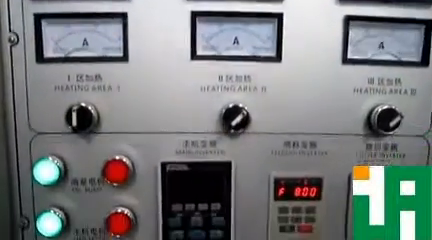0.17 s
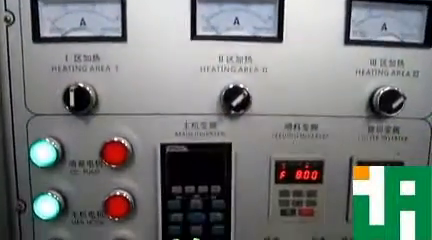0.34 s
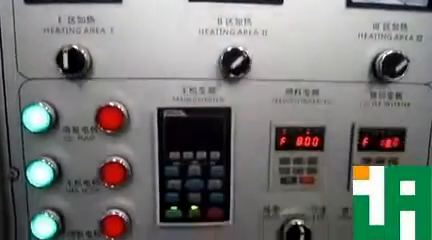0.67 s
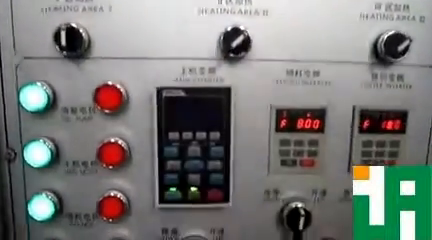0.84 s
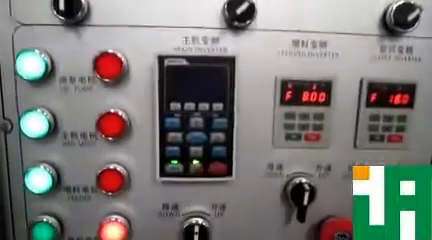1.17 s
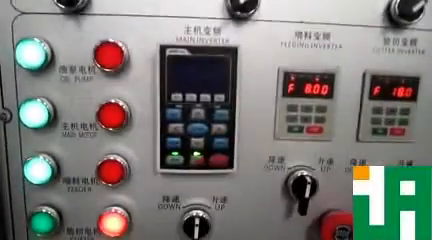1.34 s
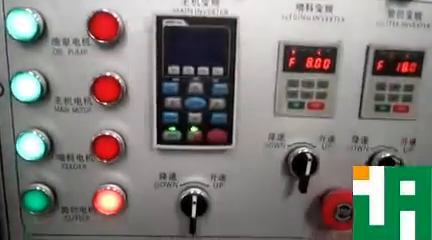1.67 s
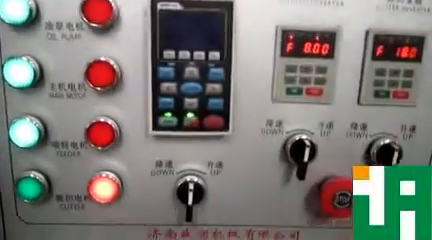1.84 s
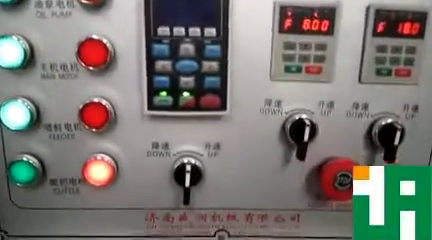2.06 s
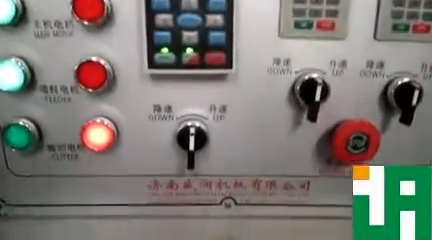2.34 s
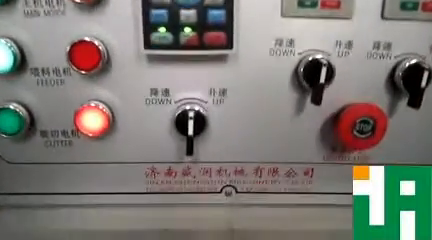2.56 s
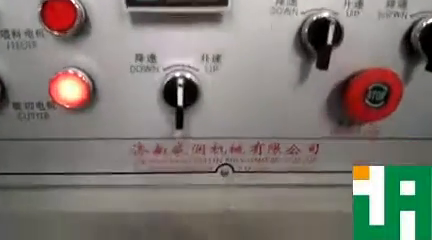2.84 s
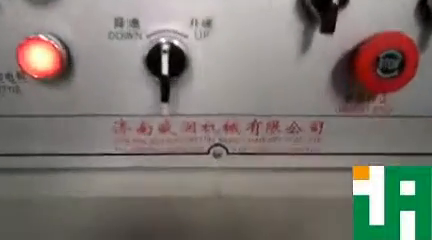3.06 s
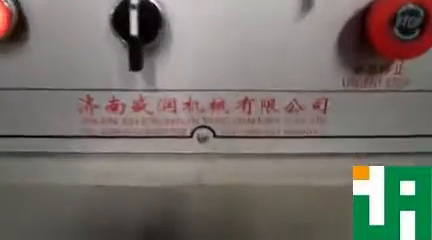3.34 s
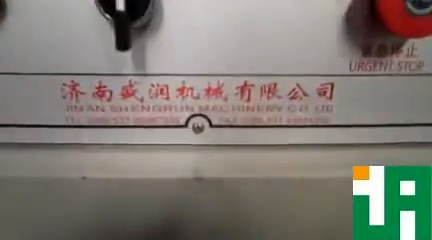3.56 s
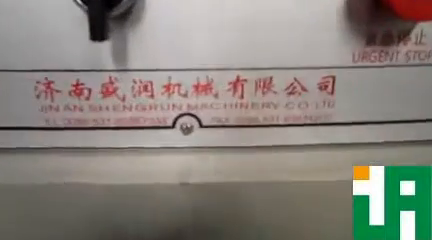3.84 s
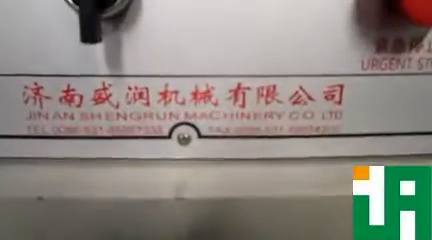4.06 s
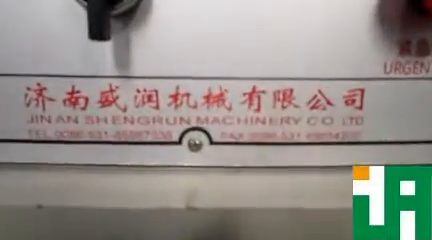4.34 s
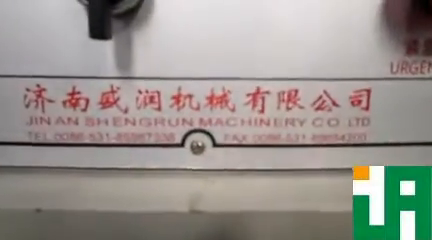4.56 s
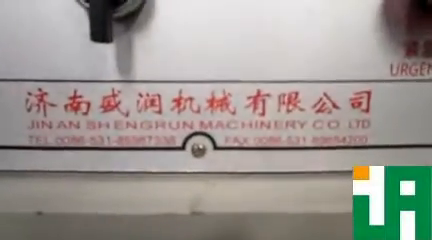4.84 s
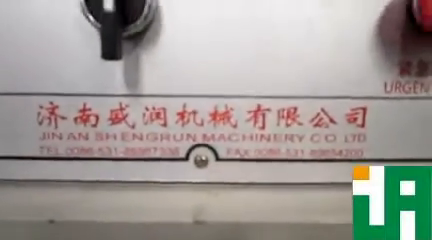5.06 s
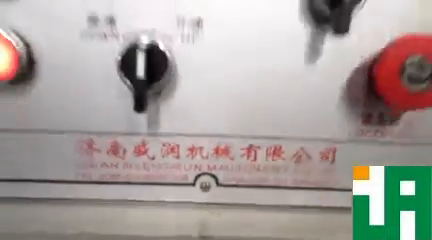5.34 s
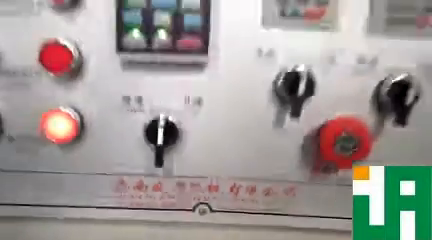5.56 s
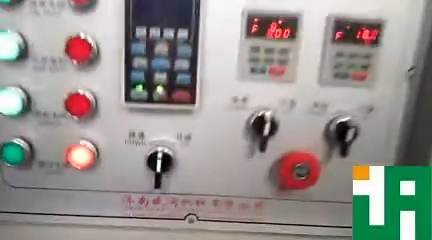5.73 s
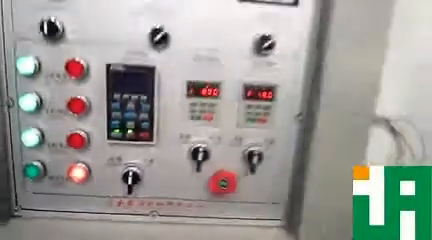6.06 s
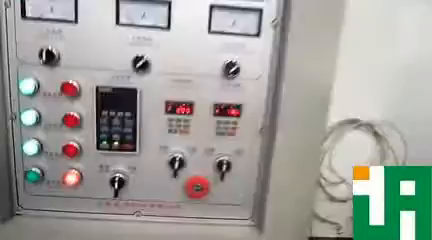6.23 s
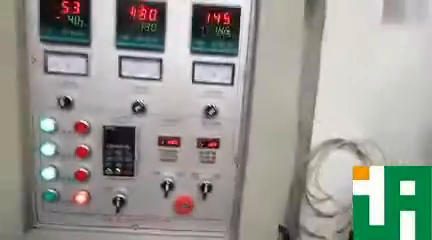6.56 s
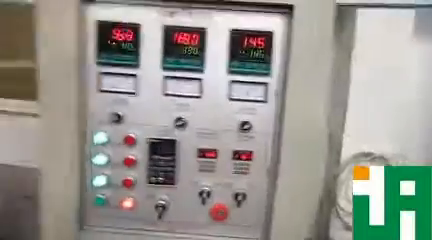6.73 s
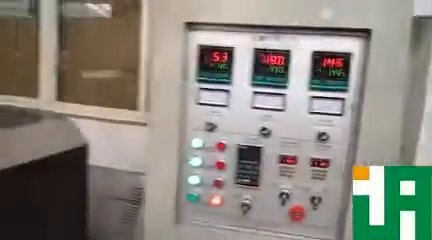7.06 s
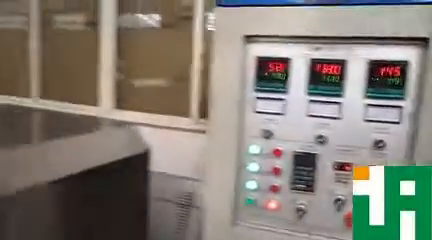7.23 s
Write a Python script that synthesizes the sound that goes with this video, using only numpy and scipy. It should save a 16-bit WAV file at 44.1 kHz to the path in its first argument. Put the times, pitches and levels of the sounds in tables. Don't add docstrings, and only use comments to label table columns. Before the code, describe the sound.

Loud steady factory machinery: a broad fan roar, a droning mid-pitched gear hum, a thin high electrical whine, and loose steel rattling.

```python
import sys
import numpy as np
from scipy import signal
from scipy.fft import rfft, irfft, next_fast_len
from scipy.io import wavfile
from scipy.ndimage import uniform_filter1d, map_coordinates

SR = 44100
rng = np.random.default_rng(int(sys.argv[2]) if len(sys.argv) > 2 else 0)


def gain_from_decibels(decibels):
    exponent = np.asarray(decibels, float) / 20
    return 10 ** exponent


def put_to_file(sound):
    columns = np.atleast_2d(sound).T
    safe = np.clip(columns, -1, 1)
    whole_steps = np.round(safe * 32767)
    wavfile.write(sys.argv[1], SR, whole_steps.astype(np.int16))


N = 325899
TIME = np.arange(N) / SR
COARSE = TIME[::64]
GEAR_HZ, PUMP_HZ = 885.7, 314.75
CARRIER_HZ, SUPPLY_HZ, SLOT_HZ = 5999.9, 30.97, 550.1


def unit(x):
    return x / np.sqrt(np.mean(x ** 2) + 1e-20)


def curves(rows):
    s, *columns = np.transpose(rows)
    return [np.interp(TIME, s, column) for column in columns]


def smooth(values):
    return np.interp(TIME, COARSE, values)


def wobble(rate):
    where = np.cumsum(np.broadcast_to(rate, len(COARSE))) * COARSE[1]
    return map_coordinates(rng.standard_normal(700), [where])


def sway(rate):
    return smooth(wobble(rate))


def bell(s, half):
    return np.exp(-((COARSE - s) / half) ** 2)


def changes(rows):
    return smooth(sum(db * bell(s, half) for s, db, half in rows))


def swells(rows, late=0):
    return smooth(gain_from_decibels(-57) + late + sum(gain_from_decibels(db) * bell(s, half) for s, db, half in rows))


def bursts(rows):
    s, db = np.transpose(rows)
    past_node = np.diff(s, prepend=s[0]) > .075
    sign = (-1) ** np.cumsum(past_node)
    return (gain_from_decibels(db) * sign) @ bell(s[:, None], .04)


def filtered(x, response):
    m = next_fast_len(N + 8192)
    return irfft(rfft(x, m) * response(np.fft.rfftfreq(m, 1 / SR)), m)[:N]


def patchy(depth_db):
    z = signal.stft(rng.standard_normal(N), nperseg=512)[2]
    field = uniform_filter1d(rng.standard_normal(z.shape), size=8, axis=0)
    field = uniform_filter1d(field, size=10, axis=1)
    return signal.istft(z * gain_from_decibels(depth_db * unit(field)), nperseg=512)[1][:N]


# (time [s], speed [fades per second])
MOTION = [
    (0, 2.08),
    (3.4, 1.05),
    (3.8, 0.39),
    (5, 0.71),
    (5.4, 5.02),
    (7.39, 4.4),
]


def camera_speed():
    return np.interp(COARSE, *np.transpose(MOTION))


def tone(hz, fade, blur=.0, start=None):
    speed = camera_speed()
    echo = 1 + fade * (wobble(speed) + 1j * wobble(speed))
    echo = echo * np.exp(1j * blur * wobble(6))
    start = rng.random() if start is None else start
    block = np.exp(2j * np.pi * (hz * COARSE + start))
    within = np.exp(2j * np.pi * hz * TIME[:64])
    turn = np.outer(block, within).ravel()[:N]
    return unit(np.real(smooth(echo) * turn))


# (time [s], roar level [dB], how low it stoops [0-1])
CAMERA = [(0, -28.5, 0.3), (.5, -27.5, 0.2), (1.2, -29, 0.2), (2, -28, 0.8), (2.5, -28.5, 0.5),
          (3.2, -29, 0.9), (4, -30, 0.85), (4.6, -30, 0.9), (5.3, -29.5, 1), (5.75, -29.5, 0.3),
          (6.3, -28.5, 0.6), (6.8, -28.5, 0.6), (7.05, -29, 1), (7.39, -28, 0.4)]
# (frequency [Hz], level [dB per Hz])
ROAR = [(15, -31), (25, -13.5), (48, -21), (162, -7), (321, -8.5), (462, -6), (567, -4), (622, -7.5),
        (799, -4.5), (875, -2), (1030, -8.5), (2610, -11.5), (5180, -18), (5800, -21.5), (7540, -53),
        (12800, -120)]
# (frequency [Hz], width [Hz], level [dB])
CASINGS = [
    (101, 26, -2),
    (170.2, 39, 0.5),
    (189, 18, -0.5),
    (263, 61, 2),
    (307, 170, -3),
    (348, 50, 4.5),
    (410, 11, 2.5),
    (501.6, 8, 5.5),
]
# (time [s], change [dB], half length [s])
SURGES = [(.28, 0, 0.065), (.4, -17, 0.059), (.49, 9.5, 0.02), (2.63, -10, 0.044), (2.96, -4.5, 0.096),
          (3.99, -0.5, 0.077), (4.28, 7, 0.017), (4.86, 2.5, 0.093), (5.2, 4, 0.051), (5.66, -3, 0.038),
          (6.2, -0.5, .15), (6.46, -9, 0.038), (6.54, 2.5, .04), (7.14, 8, 0.029)]
# (time [s], change [dB], half length [s])
GUSTS = [
    (1.0, 0, 0.034),
    (1.9, 1, .1),
    (3.93, 1.5, 0.074),
    (4.48, 0, 0.064),
    (5.9, 0.5, 0.11),
]


def air():
    gain_db, low = curves(CAMERA)
    bright_db = -0.2 - 0.8 * low + 0.43 * sway(3)
    rumble_db = -32 + 3.5 * low + changes(SURGES)
    f, level = np.transpose(ROAR)

    def spectrum(hz):
        return gain_from_decibels(np.interp(np.log(hz + 1), np.log(f[:-2]), level[:-2]))

    def hollow(hz):
        return 1 - .55 * sum(np.exp(-((hz - c) / 9) ** 2) for c in (GEAR_HZ, 2 * PUMP_HZ))

    def casing(hz):
        return np.sqrt(sum(gain_from_decibels(2 * db) / (1 + (2 * (hz - c) / w) ** 4) for c, w, db in CASINGS))

    roar = unit(filtered(patchy(depth_db=0.25), spectrum))
    roar = filtered(roar, hollow)
    hiss = filtered(roar, lambda hz: hz ** 2 / (hz ** 2 + 3000 ** 2))
    rumble = unit(filtered(patchy(depth_db=0.5), casing))
    flutter_db = smooth(0.37 * wobble(11) + .5 * wobble(30) + .5 * wobble(90))
    fans = gain_from_decibels(flutter_db) * gain_from_decibels(gain_db + 5.5 + changes(GUSTS)) * (roar + (gain_from_decibels(bright_db) - 1) * hiss)
    return fans + gain_from_decibels(rumble_db) * rumble


# (frequency [Hz], level [dB])
FAR = [
    (640, -47),
    (995.5, -48),
    (375, -45),
    (445.5, -50),
    (5475, -56),
    (5680, -60),
]
# (time [s], level [dB])
KNOCKS = [(2.2, -33.5), (2.47, -36), (2.5, -33.5), (3.8, -30.5), (3.865, -32), (3.89, -33), (3.98, -25.5),
          (5.24, -33.5), (5.42, -38), (5.88, -31.5), (5.9, -35)]


def far():
    hum = sum(gain_from_decibels(db) * tone(hz, fade=.4, blur=.3) for hz, db in FAR)
    noise = rng.standard_normal(N)
    grit = unit(filtered(noise, lambda hz: hz ** 2 / (hz ** 2 + 1400 ** 2) / (1 + (hz / 4200) ** 4)))
    s, db = np.transpose(KNOCKS)
    since = np.maximum(TIME - s[:, None], 0)
    rise = 1 - np.exp(-since / .004)
    decay = gain_from_decibels(-60 * since / .12)
    return hum + (gain_from_decibels(db) @ (decay * rise)) * grit


# (time [s], pitch [Hz], level [dB])
CHINKS = [(0.25, 1205, -27), (0.798, 3962, -33), (0.994, 1894, -28), (1.898, 3962, -32), (1.927, 1550, -27),
          (2.975, 1550, -29), (3.168, 1464, -27), (3.294, 3359, -34), (3.872, 4565, -30),
          (3.897, 3875, -31), (3.976, 3531, -33), (3.985, 2928, -32), (3.987, 2497, -30),
          (4.824, 4737, -35), (5.087, 4823, -36), (5.24, 3100, -32), (5.423, 4306, -32), (5.571, 1894, -29),
          (5.692, 2497, -31), (5.898, 3703, -32), (5.983, 3617, -33), (6.311, 1119, -26),
          (6.493, 4737, -34)]


def rattle(count=900):
    when, pitch, size = rng.random((count, 3)).T
    s, hz, db = np.transpose(CHINKS)
    s = np.r_[s - .008, when * N / SR][:, None]
    hz = np.r_[hz, 1500 * 3.6 ** pitch][:, None]
    db = np.r_[db + 3.5, -41 + 7 * size - 6 * pitch][:, None]
    t = np.arange(SR // 20) / SR
    envelope = gain_from_decibels(db - 60 * t / 0.07) * (1 - np.exp(-t / .0025))
    partials = np.sin(2 * np.pi * hz * t) + .6 * np.sin(2 * np.pi * 1.045 * hz * t)
    ring = envelope * partials * .8
    at = (s * SR).astype(int) + np.arange(len(t))
    return np.bincount(at.ravel(), ring.ravel(), N + len(t))[:N]


# (time [s], pitch [Hz], half length [s], level [dB], octave [dB])
SQUEAKS = [(2.492, 668, .024, -26, 1), (.27, 416, .06, -23, -30), (7.25, 836, .1, -29, -30),
           (6.68, 935, .06, -33, -30), (6.15, 1449, .25, -39, -30), (6.32, 1056, .15, -38, -30),
           (6.6, 705.2, .25, -33.5, -30), (5.76, 416, .05, -27, -30), (5.9, 185, .08, -30, -30),
           (5.55, 1860, .05, -37, -30), (5.9, 1470, .12, -39, -30)]


def belt():
    x = np.zeros(N)
    for s, hz, half, db, octave_db in SQUEAKS:
        turn = 2 * np.pi * hz * TIME
        envelope = gain_from_decibels(db) * np.exp(-((TIME - s) / half) ** 4)
        x += envelope * (np.sin(turn) + gain_from_decibels(octave_db) * np.sin(2 * turn))
    return x


# (frequency [Hz], from [s], to [s], level [dB])
SPANS = [
    (1449.5, 0, 1.2, -45),
    (1449.5, 1.4, 4.1, -43.5),
    (1449.5, 5.8, 7.1, -46),
    (1200.5, 3.3, 5.7, -41.5),
    (1081.4, 5.9, 6.6, -42),
    (1228.7, .9, 1.9, -44),
]


def spans():
    x = np.zeros(N)
    for hz, start, end, db in SPANS:
        gate = (np.tanh((TIME - start) / .08) - np.tanh((TIME - end) / .08)) / 2
        x += gain_from_decibels(db + 1.5 * sway(5)) * gate * tone(hz, fade=.2, blur=.3)
    return x


# (order [cycles per turn], level [dB])
MESH = [(25, -51.2), (29, -57.6), (30, -53.2), (31, -55.2), (37, -55.0), (39, -58.3), (40, -55.9),
        (41, -53.3), (43, -57.6), (45, -53.1), (47, -52.7), (48, -41.5), (49, -41.6), (50, -53.6),
        (56, -47.1), (57, -48.6), (58, -53.7), (62, -55.8), (64, -46.3), (66, -55.5), (69, -48.0),
        (71, -45.5), (72, -41.6), (73, -42.3), (74, -49.1), (75, -43.2), (76, -50.6), (77, -49.3),
        (79, -52.0), (81, -47.9), (82, -45.8), (84, -48.6), (89, -50.3), (93, -55.1), (95, -50.8),
        (96, -39.2), (97, -47.2), (101, -52.5), (102, -53.0), (112, -55.3), (115, -55.0), (116, -54.3),
        (117, -50.0), (119, -48.0), (120, -38.6), (121, -49.6), (122, -54.0), (130, -56.5), (132, -53.4),
        (139, -57.5), (140, -54.7), (141, -58.1), (144, -45.0), (145, -46.0), (147, -52.0), (151, -58.4),
        (152, -55.4), (153, -52.2), (167, -57.7), (168, -57.9)]
# (time [s], change [dB], half length [s])
GEARBOX_NODES = [
    (6.2, -4, .2),
    (7.15, -3.5, .15),
    (2.25, -3.5, .1),
]


def gearbox():
    shaft_hz, teeth, loudest_s = 3.469, 24, .255
    t = TIME[::16]
    speed = camera_speed() / 2
    group = 2 * np.pi * rng.random(teeth)
    x = 0
    for order, db in MESH:
        echo = np.interp(t, COARSE, 1 + .25 * (wobble(speed) + 1j * wobble(speed)))
        scatter = .55 if order > 3.7 * teeth else 1.5
        phase = 2 * np.pi * order * shaft_hz * (t - loudest_s)
        phase = phase + group[round(order / teeth)] + scatter * rng.standard_normal()
        x = x + gain_from_decibels(db + .8) * unit(np.real(echo * np.exp(1j * phase)))
    return gain_from_decibels(changes(GEARBOX_NODES)) * signal.resample_poly(x, 16, 1)[:N]


# (time [s], level [dB])
GEAR = [(0, -34), (.27, -34), (.45, -31.5), (.7, -32), (.95, -28), (1.55, -25.5), (1.9, -30.5), (2.13, -26),
        (3, -24.5), (4, -21.5), (5.3, -23), (5.75, -25), (5.93, -32.5), (6.25, -22), (6.45, -27.5),
        (6.73, -37), (7.12, -25.5), (7.39, -34)]
# (time [s], change [dB], half length [s])
GEAR_DIPS = [
    (1.14, -4, .07),
    (4.0, -1, 0.088),
    (1.3, -4.5, 0.083),
    (2.62, -3.5, 0.074),
    (3.22, -4, 0.09),
    (3.7, -3, 0.16),
    (4.33, -4, 0.19),
    (4.95, -4, 0.1),
]
# (time [s], level [dB])
PUMP = [(0, -47), (.3, -38), (.5, -49), (1, -40), (1.5, -33), (2, -33.5), (2.6, -30), (3, -33),
        (3.25, -28.5), (4.5, -28.5), (5.15, -30), (5.6, -30.5), (5.9, -50), (6.1, -52), (6.3, -32.5),
        (6.7, -43.5), (7.03, -34), (7.39, -31.5)]
# (time [s], change [dB], half length [s])
SECOND_NODES = [(.0, -4, 0.073), (.2, -6, .07), (.7, 4, 0.032), (1.9, 3, 0.33), (2.3, -9, 0.046),
                (2.65, 0.5, .15), (2.88, -2, .07), (3.43, -14, 0.12), (3.95, -10, 0.17), (5.15, -10, 0.099),
                (5.75, -2, 0.22), (6.47, -8, 0.13), (6.72, -1, .08), (6.95, -6.5, .13), (7.3, 3, .1)]
# (frequency [Hz], level held high [dB], change when low [dB])
STOOPED = [
    (705.2, -49, 8),
    (1200.5, -58, 8),
]
# (frequency [Hz], level [dB])
TONES = [(43, -56.1), (185.7, -45.3), (368.8, -41.4), (617.7, -49), (623.6, -48), (635.3, -48),
         (712.6, -50), (879.8, -49), (891.6, -46), (666.2, -45), (466.3, -42.6), (571.3, -47.4),
         (736.8, -49.4), (786.6, -50.9), (827.7, -47.2), (839.1, -46.8), (862.7, -48.8), (909.1, -51.4),
         (932.7, -48.3), (944.1, -50.1), (958.2, -51.7), (1056.5, -48.8), (1081.4, -46.5), (1105.6, -57.3),
         (1228.7, -48.2), (1285.9, -50.5), (1425.2, -54.2), (1449.5, -54), (1474.4, -53.1), (1818.2, -51.4)]


def gears():
    low = curves(CAMERA)[1]
    gear_db = curves(GEAR)[0] + changes(GEAR_DIPS) + 0.66 * sway(16)
    first_db = curves(PUMP)[0] + 2.2 * sway(7.7)
    second_db = -29 - 7 * low + changes(SECOND_NODES) + (0.28 + 0.84 * low) * sway(5.0)
    turn = 1 + 0.054 * np.cos(2 * np.pi * 11.0 * TIME)
    x = gain_from_decibels(gear_db) * turn * tone(GEAR_HZ, fade=0.078, blur=0.17)
    x += gain_from_decibels(second_db) * tone(2 * PUMP_HZ, fade=.03, blur=.4)
    x += gain_from_decibels(first_db) * tone(PUMP_HZ, fade=.03, blur=.2)
    x += sum(gain_from_decibels(db + low_db * low) * tone(hz, fade=.25, blur=.5) for hz, db, low_db in STOOPED)
    return x + sum(gain_from_decibels(db) * tone(hz, fade=.4, blur=.35) for hz, db in TONES)


# (time [s], level [dB], half length [s])
FIRST_SWELLS = [(.1, -42.5, .24), (.98, -43, 0.067), (1.2, -46, 0.11), (1.47, -44.5, 0.21),
                (1.97, -50, 0.058), (2.25, -50, 0.053), (2.75, -42.5, 0.21), (3.3, -53, 0.12),
                (3.85, -44, 0.12), (4.2, -45.5, .28), (4.88, -42, 0.19)]
THIRD_SWELLS = [
    (0, -50.5, 0.15),
    (.32, -52, 0.097),
    (.62, -45, 0.21),
    (1.38, -44.5, 0.52),
    (2.7, -51, .22),
    (3.15, -46, 0.11),
    (3.45, -48.5, 0.1),
    (3.97, -45, 0.15),
    (4.72, -50, 0.18),
]
FIFTH_SWELLS = [
    (.15, -57, 0.34),
    (.75, -43.5, 0.18),
    (1.35, -54, .1),
    (1.8, -46.5, 0.2),
    (2.8, -51, 0.39),
    (3.68, -44.5, 0.15),
    (4.65, -53, 0.24),
]
SLOT_SWELLS = [
    (.7, -47, 0.19),
    (1.2, -53, 0.089),
    (2.1, -46, 0.2),
    (2.75, -53, .25),
    (3.15, -49, .1),
    (3.6, -45, 0.23),
    (4.05, -47.5, .2),
    (4.85, -49, 0.22),
]
NINTH_SWELLS = [
    (.6, -55, 0.15),
    (1.0, -54, .08),
    (2.05, -53, 0.16),
    (2.7, -52.5, 0.23),
    (3.6, -57, .2),
    (4.35, -54.5, .28),
    (5.5, -52, 0.16),
    (6.4, -60, .3),
]
ELEVENTH_SWELLS = [
    (.5, -54, 0.18),
    (1.25, -51.5, 0.16),
    (1.85, -59, 0.2),
    (2.7, -53.5, .2),
    (3.6, -56, 0.25),
    (4.15, -54, .17),
    (4.9, -56.5, .2),
    (6.1, -58, 0.28),
]
# (time [s], level [dB])
FIRST_BURSTS = [(5.3, -47), (5.35, -48), (5.48, -47), (5.57, -45), (5.65, -44), (5.73, -45), (5.82, -51.5),
                (5.9, -45), (6.01, -40), (6.11, -44.5), (6.2, -39), (6.31, -45.5), (6.57, -40), (6.68, -54),
                (6.82, -53), (6.92, -41), (7.06, -45)]
THIRD_BURSTS = [(5.21, -49), (5.29, -54), (5.35, -40), (5.48, -43), (5.56, -40.5), (5.64, -48), (5.71, -51),
                (5.79, -41), (5.89, -43), (6.05, -39), (6.14, -45), (6.21, -52), (6.3, -43.5), (6.38, -49),
                (6.46, -38), (6.5, -41.5), (6.56, -51), (6.64, -39), (6.68, -55), (6.76, -44.5),
                (6.84, -41), (6.94, -39.5), (7.03, -50), (7.09, -51), (7.15, -53), (7.2, -50), (7.3, -42.5),
                (7.37, -47.5)]
FIFTH_BURSTS = [(5.2, -50), (5.29, -46), (5.57, -53), (5.73, -42.5), (5.98, -53), (6.08, -50), (6.19, -56),
                (6.55, -42), (6.75, -48), (6.8, -48), (6.91, -48), (6.96, -38), (7.09, -49), (7.2, -50),
                (7.37, -44.5)]
SLOT_BURSTS = [(5.33, -45), (5.52, -39), (5.62, -51), (5.69, -54), (5.95, -48), (6.01, -47), (6.2, -53),
               (6.31, -52), (6.38, -42), (6.46, -48), (6.73, -42), (6.93, -48), (7.08, -40), (7.19, -55),
               (7.31, -46), (7.38, -56)]
# (odd multiple of the supply below the carrier [count], level [dB])
SIDEBANDS = [(7, -60.8), (9, -55.4), (11, -55.1), (13, -61.4), (15, -59), (17, -58.1), (19, -62.1),
             (23, -63.1), (25, -65.4), (27, -60.5), (29, -59.1), (31, -63.1), (33, -60.3), (39, -59.6),
             (45, -56.6), (49, -62.9), (51, -58.5), (61, -59.3), (65, -55.9), (67, -55.9), (71, -56.7),
             (73, -57.1)]
# (offset [supply multiples], level [dB])
SLOTS = [
    (0, 0),
    (-6, -7),
    (6, -13),
]


def inverter():
    def side(k, fade, blur, start=None):
        return tone(CARRIER_HZ - k * SUPPLY_HZ, fade, blur, start)

    first = swells(FIRST_SWELLS, bursts(FIRST_BURSTS))
    third = swells(THIRD_SWELLS, bursts(THIRD_BURSTS))
    fifth = swells(FIFTH_SWELLS, bursts(FIFTH_BURSTS))
    slot = swells(SLOT_SWELLS, bursts(SLOT_BURSTS))
    strong = first * side(1, .05, .35, 0) - third * side(3, .05, .4, .06) - fifth * side(5, .05, .4, 0)
    own = {9: swells(NINTH_SWELLS), 11: swells(ELEVENTH_SWELLS)}
    weak = 0
    for k, db in SIDEBANDS:
        weak = weak + own.get(k, gain_from_decibels(db)) * side(k, .1 if k in own else .7, .45)
    slots = 0
    for k, db in SLOTS:
        slots = slots + gain_from_decibels(db) * tone(CARRIER_HZ - SLOT_HZ + k * SUPPLY_HZ, fade=.06, blur=.3)
    return gain_from_decibels(0.59 * sway(12)) * strong + gain_from_decibels(-1.0) * weak + slot * slots


def scene():
    x = air() + far() + rattle() + belt() + spans() + gearbox() + gears() + inverter()
    return np.array([x, x])


def mirrored(x):
    below = filtered(x, lambda hz: hz < CARRIER_HZ)
    flipped = below * 2 * np.cos(2 * np.pi * 2 * CARRIER_HZ * TIME)
    image = filtered(flipped, lambda hz: (hz > CARRIER_HZ) * gain_from_decibels(-.02 * np.abs(hz - CARRIER_HZ)))
    return below + image


# (time [s], from [Hz], to [Hz], level [dB])
SPLITS = [
    (3.139, 4100, 5250, -45),
    (3.905, 4100, 5700, -40),
    (6.808, 5550, 6900, -41),
    (6.97, 4100, 5800, -40),
]


def split():
    noise = rng.standard_normal(N)
    x = np.zeros(N)
    for s, lo, hi, db in SPLITS:
        band = unit(filtered(noise, lambda hz: (hz > lo) & (hz < hi)))
        x += gain_from_decibels(db) * np.exp(-((TIME - s) / .016) ** 4) * band
    return x


def low_pass(x):
    return signal.sosfilt(signal.butter(12, 7280, fs=SR, output="sos"), x)


# (time [s], depth [dB], recovery [s])
DUCKS = [(0.551, -2.5, 0.073), (0.831, -2.5, 0.033), (1.266, -0.5, 0.033), (2.276, -5, .15),
         (2.3, -0.5, .08), (2.61, -4, 0.018), (3.385, -3, 0.059), (4.0, 0.5, 0.12), (4.32, -1.5, 0.043),
         (4.6, -1, 0.066), (4.73, -2, 0.045), (6.251, -1.5, 0.033), (6.448, -1.5, 0.038), (6.87, -2, 0.045)]
# (from [Hz], share of time kept [0-1])
TOP_BANDS = [
    (6950, .85),
    (7040, .55),
    (7150, .3),
]


def record(dry):
    duck_db = 0
    for s, db, back in DUCKS:
        duck_db = duck_db + db * (TIME > s) * np.exp(-np.abs((TIME - s) / back) ** 3)
    mono = dry[0] * gain_from_decibels(uniform_filter1d(duck_db, size=300))
    mono = mono / (1 + np.abs(mono / .46) ** 6) ** (1 / 6)
    mono = filtered(mono, lambda hz: hz ** 4 / np.sqrt(hz ** 8 + 36 ** 8))
    hz, t, z = signal.stft(mirrored(mono), SR, nperseg=2048)
    for from_hz, share in TOP_BANDS:
        z[hz > from_hz] *= np.repeat(rng.random(len(t)) < share, 2)[:len(t)]
    mono = signal.istft(z, SR, nperseg=2048)[1][:N] - .0037
    side = split()
    return low_pass(np.array([mono + side, mono - side]))


dry = scene()
out = record(dry)
put_to_file(out)
```